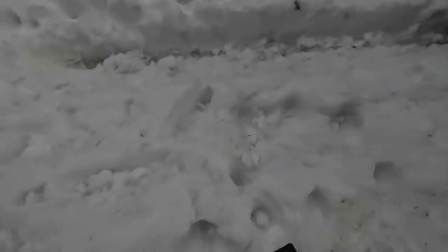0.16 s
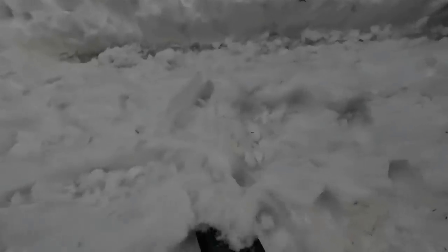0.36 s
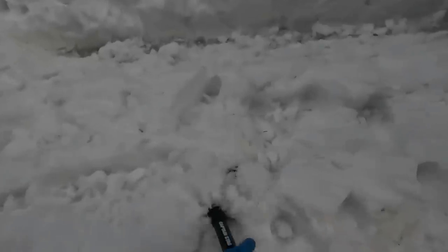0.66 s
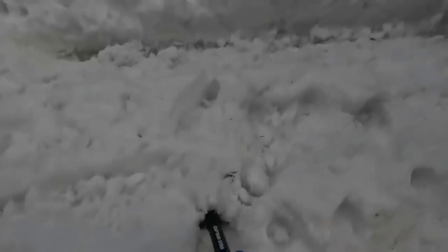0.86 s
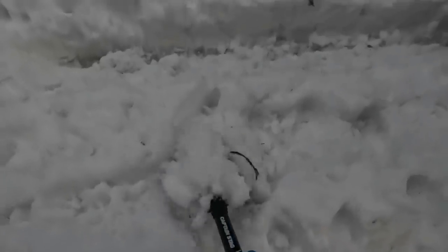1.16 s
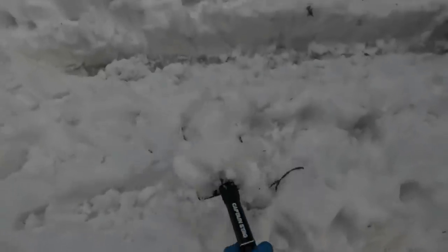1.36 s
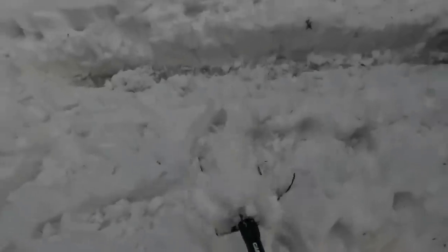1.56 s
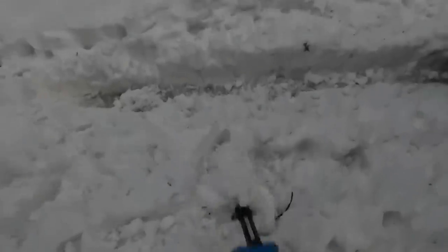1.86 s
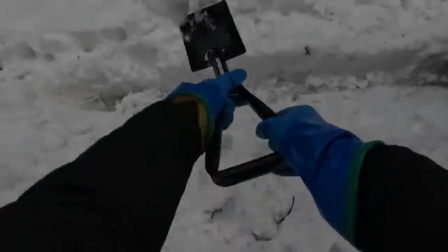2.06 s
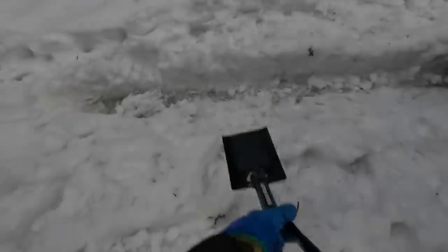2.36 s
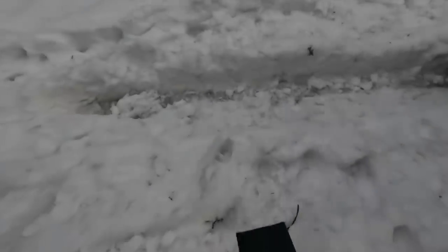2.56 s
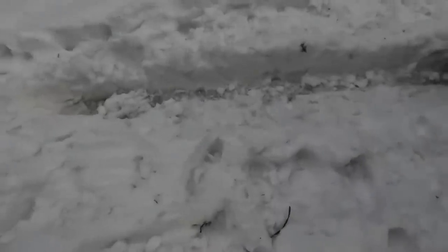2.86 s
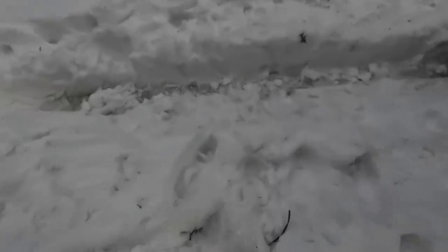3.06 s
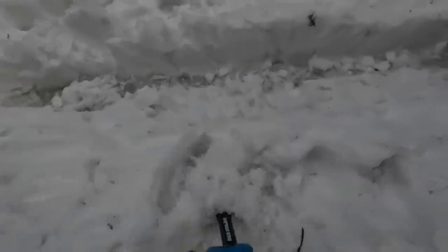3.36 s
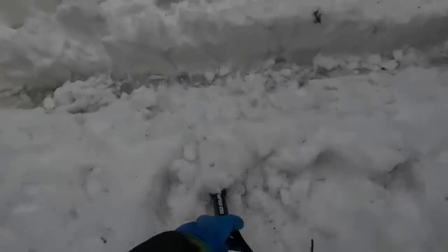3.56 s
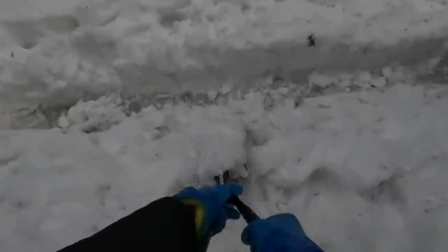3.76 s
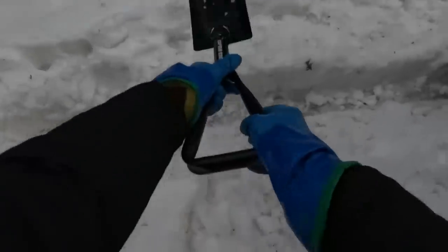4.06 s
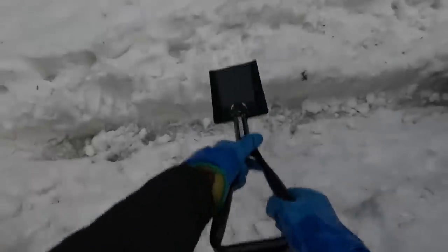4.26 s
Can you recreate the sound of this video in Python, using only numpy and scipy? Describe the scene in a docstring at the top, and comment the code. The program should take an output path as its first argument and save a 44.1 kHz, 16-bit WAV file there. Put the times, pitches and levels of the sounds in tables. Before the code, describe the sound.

A small metal shovel bites into packed snow with sharp crunching scrapes, lifts and empties, then digs a second time outdoors.

```python
"""Over steady outdoor hiss, low rumble and a faint treble rustle, a small steel folding shovel
is pushed into packed snow, lifted and emptied, twice.
Random crystal fractures scrape and ring damped blade and shaft modes; filtered fractures crunch.
Noise bursts snap, low resonances thud, and decaying sines ring the emptied blade."""
import sys
import numpy as np
from scipy import signal
from scipy.fft import rfft, irfft
from scipy.io import wavfile

SR = 44100
rng = np.random.default_rng(int(sys.argv[2]) if len(sys.argv) > 2 else 0)


def dump(signal):
    """Clip the signal to [-1, 1] and save it as 16-bit WAV at the path in sys.argv[1]."""
    limited = np.clip(np.atleast_2d(signal).T, -1, 1)
    pcm = np.round(limited * 32767).astype(np.int16)
    wavfile.write(sys.argv[1], SR, pcm)


N = 194040


def from_db(db):
    """Amplitude gain of a level in dB."""
    return 10 ** (np.asarray(db) / 20)


def rms_one(x):
    """Scale to unit rms."""
    return x / np.sqrt(np.mean(x ** 2) + 1e-20)


def in_time(rows):
    """Interpolate each column after the first over the samples."""
    time_s, *columns = np.transpose(rows)
    return [np.interp(np.arange(N) / SR, time_s, column) for column in columns]


def colour(x, spectrum, size=4096):
    """Minimum-phase filter through the spectrum points, so that clicks stay sharp; rms 1."""
    hz, level_db = np.transpose(spectrum)
    log_hz = np.log(np.maximum(np.arange(size // 2 + 1) * SR / size, 1))
    gain = from_db(np.interp(log_hz, np.log(hz), level_db))
    cepstrum = irfft(np.log(gain))
    # fold to the causal half: minimum phase
    cepstrum[1:size // 2] *= 2
    cepstrum[size // 2 + 1:] = 0
    impulse = irfft(np.exp(rfft(cepstrum)))
    return rms_one(signal.fftconvolve(x, impulse)[:N])


def drift(rate_hz):
    """Slow random curve of rms 1: noise through a double real pole."""
    r = np.exp(-2 * np.pi * rate_hz / SR)
    noise = rng.standard_normal(N + SR)
    return rms_one(signal.lfilter([1], [1, -2 * r, r * r], noise)[SR:])


def resonance(x, hz, width_hz):
    """Two-pole resonance, peak gain about 1."""
    r = np.exp(-np.pi * width_hz / SR)
    zeros = np.array([1, 0, -1]) * (1 - r * r) / 2
    poles = [1, -2 * r * np.cos(2 * np.pi * hz / SR), r * r]
    return signal.lfilter(zeros, poles, x)


CRYSTAL_SPREAD_DB, CLUMP_DB = 2.5, 2.5


def crystals(per_s, slip_hz, load):
    """Random fractures of uneven size; stick and slip bunch them into clumps in proportion to load."""
    size_db = CRYSTAL_SPREAD_DB * np.minimum(rng.exponential(1, N), 5)
    sizes = from_db(size_db) * rng.choice([-1, 1], N)
    hits = rng.random(N) < per_s / SR
    return sizes * hits * from_db(CLUMP_DB * load * drift(slip_hz))


def steel(x, modes, shift_db):
    """Parallel modes; the contact point wanders, so each one swells and fades by itself."""
    out = np.zeros(len(x))
    for k, (hz, width_hz, level_db, *_) in enumerate(modes):
        drive = x * from_db(level_db + shift_db * drift(12.36))
        out += (-1) ** k * resonance(drive, hz, width_hz)
    return out


# Outdoor hiss spectrum: [f/Hz, relative level/dB]
AIR_SPECTRUM = [(41, -32), (70, -0.5), (103, -10), (190, -2.5), (631, -8.5), (994, -1.5), (2250, -1.5),
                (3160, 2), (7480, -15), (10300, -33), (12000, -27), (14800, -36.5), (15800, -26)]
AIR_MEAN_DB, AIR_DRIFT_DB, AIR_DRIFT_HZ = -39, 2.2, 3.9


def air():
    """Coloured noise whose level drifts slightly."""
    level_db = AIR_MEAN_DB + AIR_DRIFT_DB * drift(AIR_DRIFT_HZ)
    return from_db(level_db) * colour(rng.standard_normal(N), AIR_SPECTRUM)


# Air and handling at the microphone: [t/s, level/dB]
RUMBLE_LEVEL = [(0.0, -44), (0.39, -45.5), (0.5, -30.5), (0.55, -38.5), (1.29, -44), (1.32, -56),
                (2.13, -37.5), (2.23, -51.5), (2.97, -36.5), (3.0, -31), (3.15, -47), (3.19, -30),
                (3.5, -47.5), (3.54, -36), (4.01, -37.5), (4.4, -55)]


def rumble():
    """Lumpy noise, 12-42 Hz, under a level curve."""
    band = signal.butter(4, [12, 42], "band", fs=SR, output="sos")
    lumps = signal.sosfilt(band, rng.standard_normal(N + SR))[SR:]
    return from_db(in_time(RUMBLE_LEVEL)[0]) * rms_one(lumps)


# Faint treble rustle: [t/s, level/dB]; also read by contact_levels
RUSTLE_LEVEL = [(0, -55), (.3, -55.5), (.75, -46.5), (1.02, -50.5), (1.3, -45), (1.44, -40), (1.5, -46.5),
                (1.66, -50.5), (1.87, -62.5), (2, -48), (2.22, -58), (2.3, -53.5), (2.9, -44.5),
                (3.06, -51), (3.7, -43.5), (4.1, -45.5), (4.25, -52), (4.4, -44.5)]
# Fine crystal hiss spectrum: [f/Hz, relative level/dB]; also read by digging
FINE_SPECTRUM = [(3530, -31), (6000, -1.5), (8540, -5), (12000, -4), (14500, -22.5), (15400, -32),
                 (15800, -39)]
CRACKLES_PER_S, CRACKLE_RE_RUSTLE_DB = 60, -12.0


def crackles():
    """Settling crumbs: sparse bright ticks that follow the rustle level."""
    ticks = colour(crystals(CRACKLES_PER_S, 8.7, 1.5), FINE_SPECTRUM)
    return from_db(in_time(RUSTLE_LEVEL)[0] + CRACKLE_RE_RUSTLE_DB) * ticks


# Contacts of blade and load with the snow: [start t/s, rise/s per 20 dB, hold/s, fall/s per 20 dB,
# scrape level/dB at start, change over hold/dB; re scrape: crunch/dB, fine hiss/dB, shaft/dB, blade/dB]
CONTACTS = [(.06, .015, 0.024, .04, -31.5, -2.5, -1.5, -10.5, 1.5, -17),
            (0.163, 0.014, 0.016, 0.022, -39, -1.5, 4.5, -10, 0.5, -12),
            (.3, 0.1, 0.0668, .006, -43, 8, -3.5, -16.5, 0, -1),
            (.375, 0.0024, 0.0104, 0.04, -12.5, -1, -18, -9, -25, 2.5),
            (0.409, .02, .012, 0.037, -23, -0.5, -18.5, -4, -17, 8.5),
            (0.449, 0.019, 0.102, 0.0346, -16.5, -0.5, -20, -11, -8.5, 0.5),
            (0.561, .02, 0.076, 0.0373, -17, -2, -8, -13, -8, -4),
            (0.658, .02, .075, 0.087, -28, -7.5, -11, -12.5, -6, -4),
            (.835, 0.035, 0.0093, 0.014, -30, 1.5, -8, -14.5, -6, -11),
            (.925, 0.0061, 0.003, 0.011, -29, -0.5, -7, -22, -3, -18),
            (0.961, 0.043, 0.0136, 0.032, -34, 0.5, -18, -5.5, -22, 3),
            (1.036, .003, 0.045, .015, -27, 1, -12, -13, -7, -8),
            (1.095, .015, .077, 0.0092, -21, 4, -16.5, -14, -5.5, -6),
            (1.187, 0.026, 0.067, 0.079, -31, -5, -21, -6.5, -8.5, -3),
            (1.298, 0.046, .15, 0.13, -40.5, -1, -25, -4, -10, -2),
            (1.936, 0.035, 0.064, .06, -40.5, 8, -16.5, -5.5, -9.5, -2),
            (2.007, .03, 0.055, .04, -36, 0, -13, -13, -7, 0),
            (2.07, 0.044, .05, .02, -33, 7, -14.5, -10, -3.5, -2),
            (2.122, 0.023, 0.026, 0.043, -28.5, 0, -19, -8, -8, -1.5),
            (2.287, 0.13, .25, 0.11, -43.5, 2.5, -7.5, -13, -3.5, -3),
            (2.568, 0.024, 0.012, 0.091, -36, 0.5, 4, -13, -3.5, 0),
            (2.696, .004, 0.0113, 0.081, -26.5, 0, -16.5, -3, -12, 2.5),
            (2.754, .03, 0.024, 0.042, -28.5, 2, -20, -3, -14.5, 3),
            (2.822, 0.0057, 0.074, 0.019, -23, -2.5, -1.5, -10.5, -2.5, -6),
            (2.924, .03, 0.092, 0.035, -43, 0.5, -0.5, -4.5, -6, -1),
            (3.073, .004, 0.053, 0.033, -21.5, -4, -8.5, -6.5, -6.5, -7),
            (3.131, .02, .045, 0.096, -18.5, -1.5, -6.5, -10.5, -6.5, 1),
            (3.23, 0.023, .21, 0.032, -17, 1, -19.5, -9.5, -14, 6),
            (3.449, 0.036, .13, .03, -19, -4, -12.5, -9, -10, -2.5),
            (3.592, 0.018, 0.032, 0.046, -25, -0.5, -4, -7.5, -5, -7),
            (3.68, .05, 0.16, 0.05, -35.5, 12, -20, -13.5, -8.5, -13),
            (3.874, 0.024, 0.011, .03, -20.5, 0, -8.5, -9.5, -4, -5),
            (3.923, .03, 0.13, .05, -40, 3.5, -10.5, -8, -6.5, -3),
            (4.032, .05, 0.032, 0.091, -33, 3, -20, -7, -9, -3),
            (4.16, .05, .24, .05, -52.5, 9, -7.5, -0.5, -17, 1.5)]
EDGE_DB, EDGE_STEPS = 20, 4  # one rise or fall time per 20 dB, four of each
ENTRY_S, ENTRY_RING_DB, ENTRY_CRUNCH_DB = 0.013, 3, -3.5  # blade still free, pack not yet loaded
BURY_FINE_DB_PER_S = -15  # the deeper the blade, the duller the hiss


def contact_levels():
    """Contacts rise, hold, fall; powers add. dB of scrape, crunch, fine hiss, shaft; blade re scrape."""
    t = np.arange(N) / SR
    power = np.full((5, N), 1e-10)
    power[2] += from_db(2 * in_time(RUSTLE_LEVEL)[0])
    edge_db = EDGE_STEPS * EDGE_DB
    for start, rise, hold, fall, level_db, change_db, crunch_db, fine_db, shaft_db, ring_db in CONTACTS:
        end = start + hold
        corners = [start - EDGE_STEPS * rise, start, end, end + EDGE_STEPS * fall]
        span = slice(max(round(corners[0] * SR), 0), round(corners[-1] * SR))
        corner_db = [-edge_db, 0, change_db, change_db - edge_db]
        shape_db = level_db + np.interp(t[span], corners, corner_db)
        held = np.clip(t[span] - start, 0, hold)
        entry = np.exp(-held / ENTRY_S)
        offsets_db = [0, crunch_db + ENTRY_CRUNCH_DB * entry, fine_db + BURY_FINE_DB_PER_S * held,
                      shaft_db, ring_db + ENTRY_RING_DB * entry]
        for layer, offset_db in zip(power, offsets_db):
            layer[span] += from_db(2 * (shape_db + offset_db))
    *levels_db, blade_db = 10 * np.log10(power)
    return *levels_db, blade_db - levels_db[0]


# Blade modes, snow-damped: [f/Hz, width/Hz, mean level/dB under load, level/dB emptied];
# also read by snaps and free_blade
BLADE_MODES = [(2637, 70, -1, -6), (2800, 30, -1.5, -9), (2850, 58, 1.5, -21), (3177, 103, -0.5, -13),
               (3304, 45, 2, -6), (3514, 115, -3, -14), (3965, 17, -7, 1), (4395, 98, -6.5, -1),
               (4750, 26.2, -2, -16), (5130, 144, -8, -14), (5530, 52, -10, -5), (5940, 120, -14.5, -17.5),
               (6830, 50, -15, -7), (7400, 190, -10.5, -22), (8770, 160, -19, -15.5), (11200, 77, -24, -15)]
# Shaft modes: [f/Hz, width/Hz, mean level/dB]
SHAFT_MODES = [(694, 63, -9.5), (909, 71, -1.5), (1006, 84, -0.5), (1200, 180, -3.5), (2044, 76, -7),
               (2226, 43, -12.5)]
# Direct scrape spectrum: [f/Hz, relative level/dB per Hz]
SCRAPE_SPECTRUM = [(760, -46), (1300, -3.5), (2650, 1.5), (3370, 1), (4020, 0), (7500, -19), (9750, -35),
                   (16500, -120)]
# Pack crunch spectrum: [f/Hz, relative level/dB]
CRUNCH_SPECTRUM = [(41, -27), (70, -5.5), (346, 0.5), (615, -3.5), (850, -9), (1100, -24), (1870, -120)]
SCRAPE_PER_S, STEEL_PER_S, CHUNKS_PER_S, CRUNCH_PER_S = 5000, 2500, 260, 1200


def digging():
    """Fractures are heard directly and through blade and shaft; the pack adds crunch."""
    scrape_db, crunch_db, fine_db, shaft_db, ring_db = contact_levels()
    load = np.clip((scrape_db + 31.5) / 18, .2, 1)  # loud strokes press hard; loose snow slides evenly
    grains = crystals(SCRAPE_PER_S, 67, load)
    on_steel = crystals(STEEL_PER_S, 45, load)
    chunks = 2.3 * load * crystals(CHUNKS_PER_S, 40, load)  # sparse, coarse breaks of the crust
    grains = grains + chunks
    on_steel = on_steel + 0.45 * chunks
    total = np.sqrt(1 + from_db(2 * ring_db))  # direct and ringing parts share the scrape level
    direct = from_db(scrape_db) / total * colour(grains, SCRAPE_SPECTRUM)
    blade_ring = rms_one(steel(on_steel, BLADE_MODES, shift_db=1.5))
    blade = from_db(scrape_db + ring_db) / total * blade_ring
    shaft = from_db(shaft_db) * rms_one(steel(on_steel, SHAFT_MODES, shift_db=2.0))
    crunch = from_db(crunch_db) * colour(crystals(CRUNCH_PER_S, 30, load), CRUNCH_SPECTRUM)
    fine = from_db(fine_db) * colour(grains, FINE_SPECTRUM)
    return direct + blade + shaft + crunch + fine


# Short bursts of breaking crust: [t/s, burst peak level/dB, centre f/Hz, noise t60/s]
CRUST_SNAPS = [(.057, -22, 2230, 0.041), (.22, -34, 10000, 0.0074), (.266, -29.5, 9000, .008),
               (0.377, -9, 4430, 0.0215), (0.388, -3, 3230, 0.019), (0.412, -8, 3020, 0.033),
               (0.447, -25, 3420, 0.045), (.537, -8, 5000, 0.016), (0.731, -20, 2900, 0.03),
               (.805, -22, 2400, .02), (.834, -24, 2480, 0.041), (.925, -23, 2200, .02),
               (1.035, -9, 2930, 0.0097), (1.085, -12, 2300, 0.016), (1.091, -2.5, 2420, 0.015),
               (1.116, -4.5, 2150, 0.026), (1.136, -8, 2100, 0.025), (1.15, -10, 2110, 0.019),
               (1.166, -6.5, 2500, 0.018), (1.206, -14, 2850, 0.047), (1.429, -25, 5000, 0.059),
               (1.546, -23.5, 5580, 0.032), (1.572, -26, 9000, .02), (1.655, -30, 9000, .025),
               (1.9933, -13, 3200, 0.01), (2.116, -21, 1500, .02), (2.151, -17, 4200, .008),
               (2.2456, -21.5, 9500, 0.019), (2.253, -22, 6860, .015), (2.367, -25, 7900, 0.032),
               (2.577, -31, 2020, 0.028), (2.645, -18, 5500, 0.028), (2.698, -15, 5700, 0.029),
               (2.821, -14.5, 4050, 0.034), (3.073, -23, 5070, .03), (3.196, -7.5, 2480, 0.0074),
               (3.23, -13, 3000, 0.0166), (3.286, -5.5, 3080, 0.025), (3.303, -3, 4000, .008),
               (3.307, -5, 3000, 0.0089), (3.878, -9, 2600, 0.015), (4.059, -20, 4500, .04),
               (4.152, -25.5, 8000, .02), (4.178, -30, 8000, .015), (4.21, -30, 8000, .02),
               (4.266, -21.5, 5900, 0.024)]
SNAP_RING_DB = -5  # gain of the blade modes driven by the bursts


def snaps():
    """Fast-dying noise, broad around its own centre, sets the blade ringing."""
    out, t = np.zeros(N + SR), np.arange(SR // 5) / SR
    for start, peak_db, hz, t60 in CRUST_SNAPS:
        crack = rng.standard_normal(len(t))
        crack[0] += 3.45  # the first break is the sharpest
        burst = crack * from_db(-60 * t / t60)
        for _ in range(2):
            burst = resonance(burst, hz, 0.79 * hz)
        out[round(start * SR):][:len(t)] += from_db(peak_db) * burst / np.abs(burst).max()
    bursts = out[:N]
    return bursts + from_db(SNAP_RING_DB) * steel(bursts, BLADE_MODES, shift_db=4.0)


# Dull pushes of load and handle: [t/s, level/dB, f/Hz]
PUSHES = [(0.057, -22.5, 222), (0.377, -17.5, 636), (0.562, -20.5, 274), (2.325, -34, 182),
          (2.505, -34, 300), (2.565, -25, 332), (2.826, -21, 240), (3.016, -24, 201), (3.1, -20.5, 310),
          (3.198, -18.5, 109), (3.271, -18.5, 95.5), (3.875, -25, 398), (3.593, -14, 73.4),
          (3.598, -17, 351.3)]
THUD_RISE_S = 0.0035


def thuds():
    """A soft contact swells for a few ms; a sine and wide low noise die within some cycles."""
    out, t = np.zeros(N + SR), np.arange(SR // 3) / SR
    for start, level_db, hz in PUSHES:
        t60 = 0.061 + 3.6 / hz
        shape = (1 - np.exp(-t / THUD_RISE_S)) * from_db(-60 * t / t60)
        noise = resonance(rng.standard_normal(len(t)), hz, 1.84 * hz)
        noise = rms_one(resonance(noise, hz, hz))
        body = shape * (1.16 * np.sin(2 * np.pi * hz * t) + 0.69 * noise)
        out[round(start * SR):][:len(t)] += from_db(level_db) * body
    return out[:N]


# Knocks on the emptied blade in the air: [t/s, level/dB]
FREE_KNOCKS = [(2.14, -29), (2.152, -22), (2.161, -27.5), (4.062, -32)]
FREE_WIDTH_HZ, FREE_SPREAD_DB = 30, 2  # one width for all modes


def free_blade():
    """Light knocks on bare steel: decaying sines, each mode with its own random strength."""
    out, t = np.zeros(N + SR), np.arange(SR // 5) / SR
    hz, _, _, free_db = np.transpose(BLADE_MODES)[..., None]
    decay = np.exp(-np.pi * FREE_WIDTH_HZ * t)
    for start, level_db in FREE_KNOCKS:
        own_db = rng.normal(0, FREE_SPREAD_DB, (len(BLADE_MODES), 1))
        modes = from_db(free_db + own_db) * np.sin(2 * np.pi * hz * t)
        out[round(start * SR):][:len(t)] += from_db(level_db) * decay * modes.sum(axis=0)
    return out[:N]


# Snow bank and vehicle side: [delay t/s, level/dB]
ECHO_PATHS = [(.007, -29), (0.017, -22)]


def echoes(near):
    """Delayed copies, dulled by a one-pole lowpass."""
    dull = signal.lfilter([.4], [1, -.6], near)
    return sum(from_db(db) * np.pad(dull, (round(delay * SR), 0))[:N] for delay, db in ECHO_PATHS)


def scene():
    """Shovel near by with dull echoes, over air and rumble."""
    near = digging() + crackles() + snaps() + free_blade() + thuds()
    return (near + echoes(near) + air() + rumble())[None]


STOPBAND_HZ = 16100


def record(dry):
    """Round the peaks by tanh, then cut the top by 60 dB."""
    rounded = 0.89 * np.tanh(dry / 0.92)
    lowpass = signal.cheby2(12, 60, STOPBAND_HZ, fs=SR, output="sos")
    return signal.sosfilt(lowpass, rounded)


dry = scene()
out = record(dry)
dump(out)
```